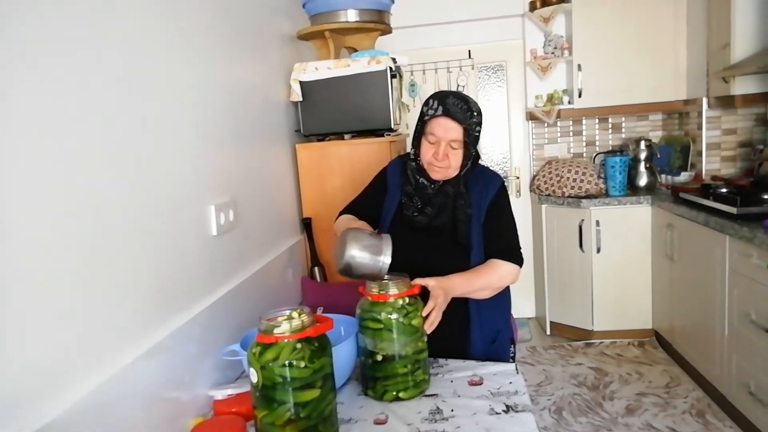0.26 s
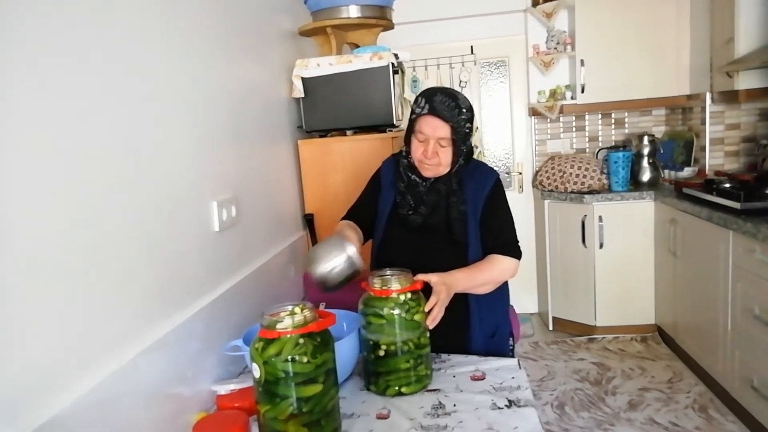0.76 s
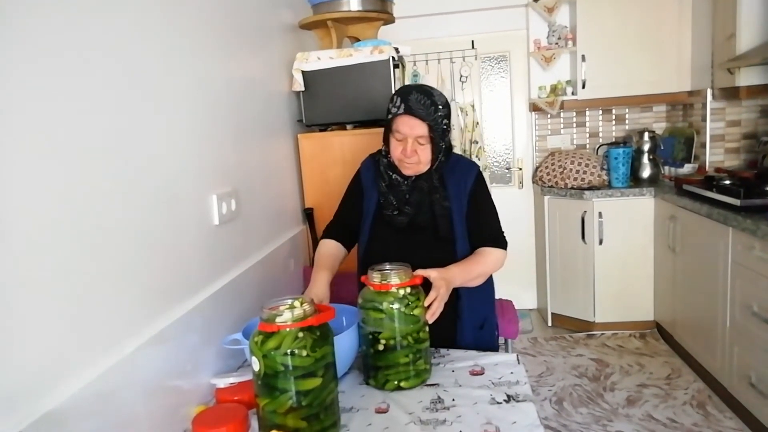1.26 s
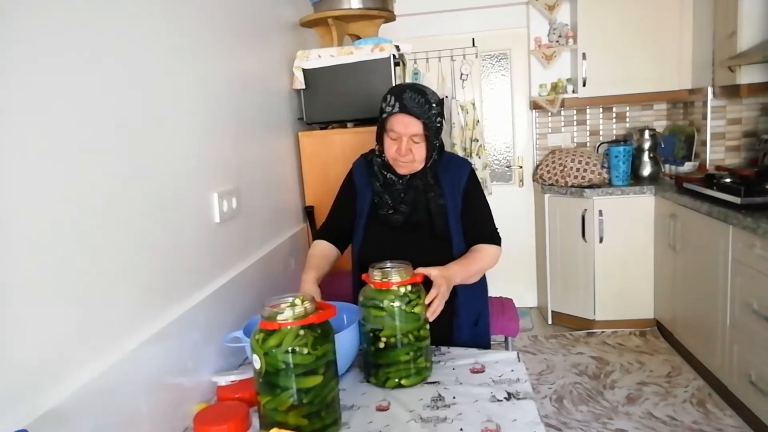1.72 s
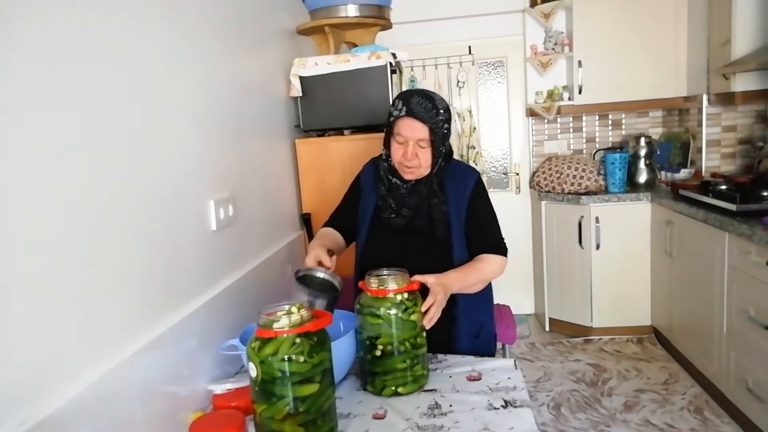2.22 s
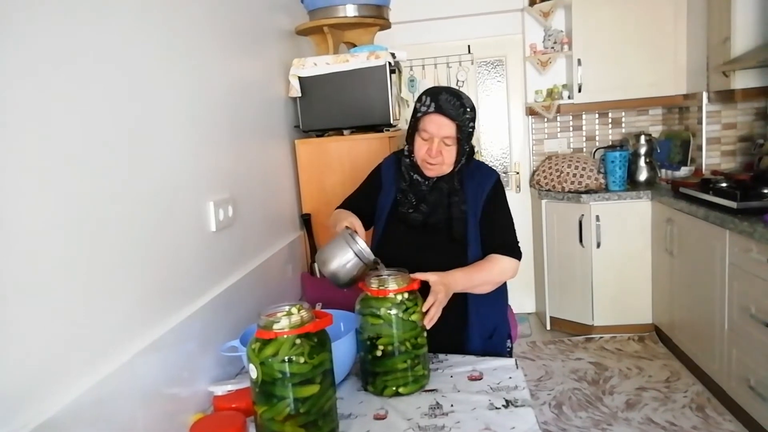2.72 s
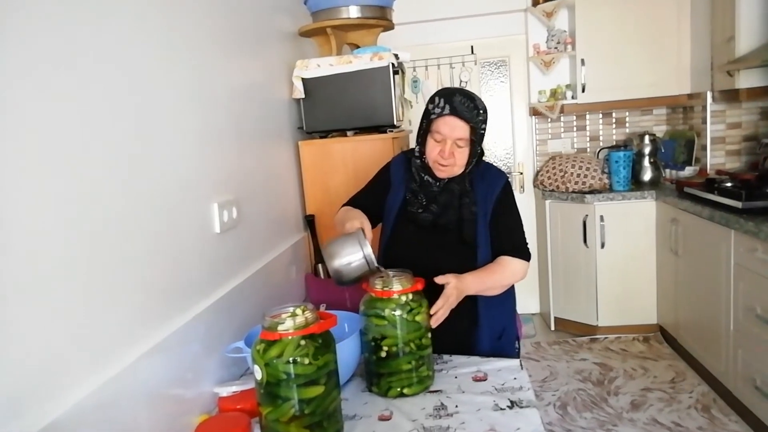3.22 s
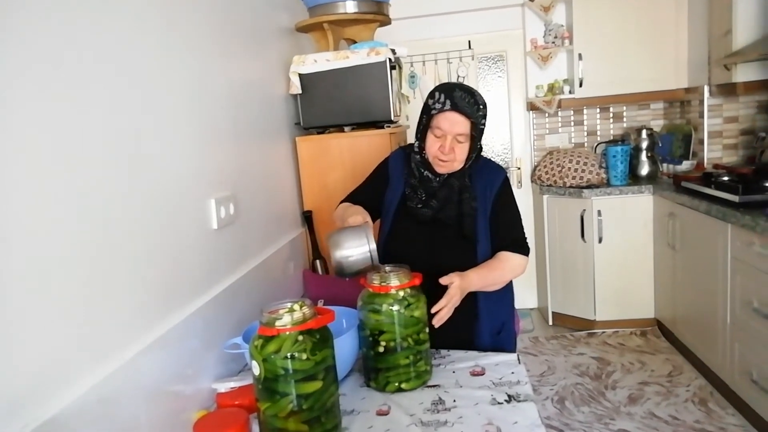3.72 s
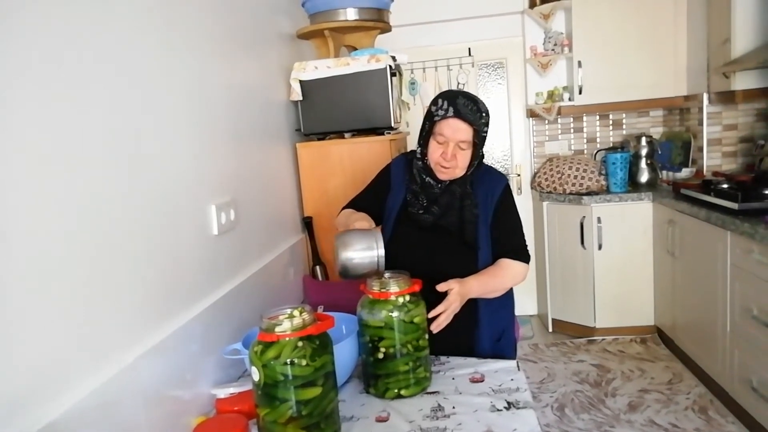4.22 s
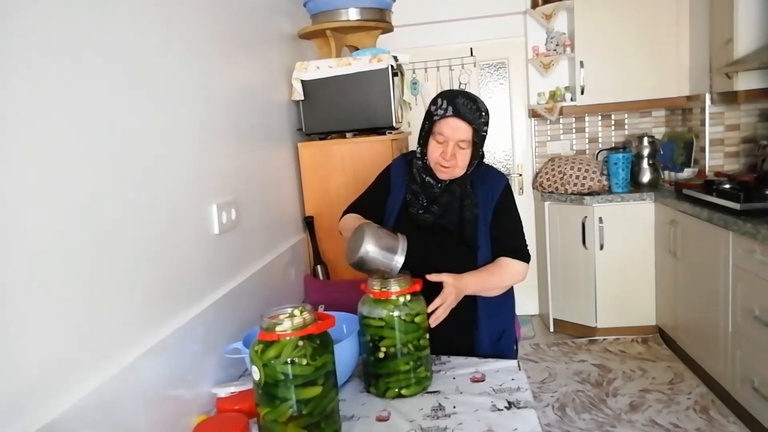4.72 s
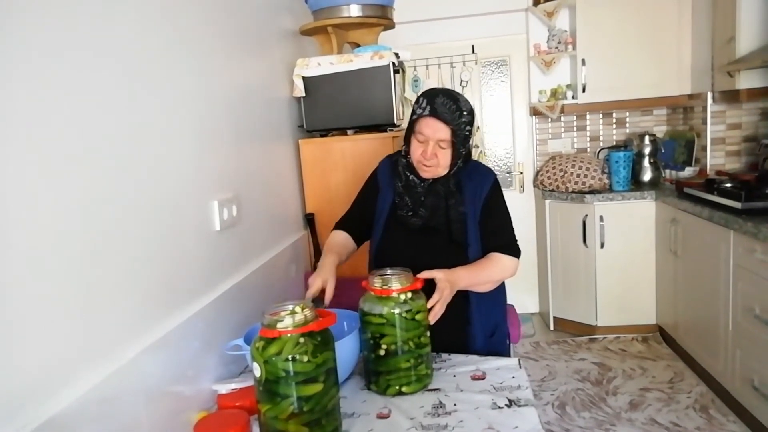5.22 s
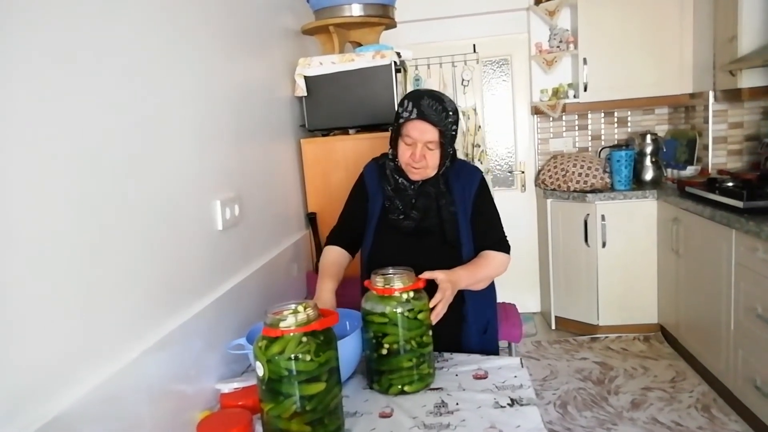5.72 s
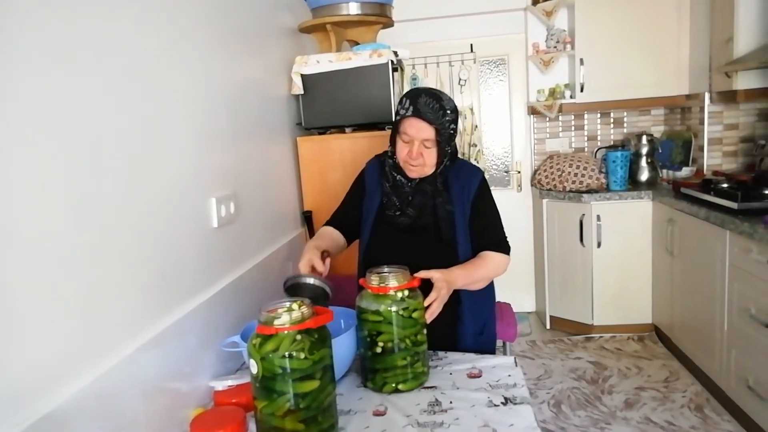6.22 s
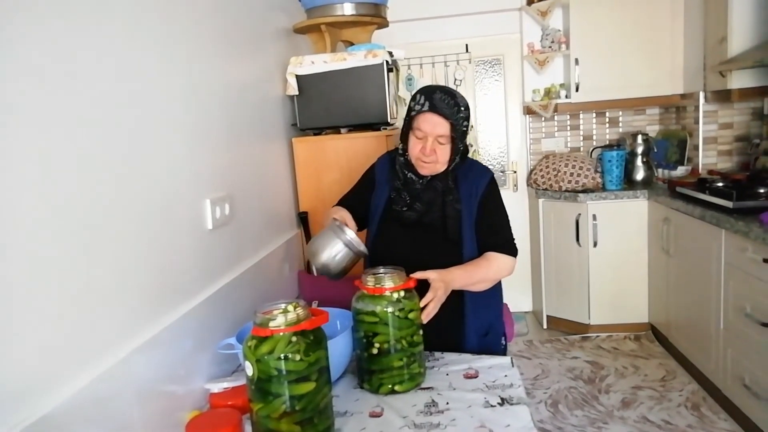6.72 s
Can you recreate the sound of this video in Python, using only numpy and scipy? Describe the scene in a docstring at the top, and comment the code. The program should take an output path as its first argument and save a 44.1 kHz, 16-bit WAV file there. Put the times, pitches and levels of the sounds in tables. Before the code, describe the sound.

Steel pot, glass jar of cucumbers and a bucket of brine, heard in stereo in a small home kitchen. A weak trickle gives way to wet snaps, dull knocks and slapping water. Bright metallic clinks on glass come next, with a rising sung note, a short gush and sparse bubbles. After a near-quiet pause with faint touches, the pot plunges again, splashing and dripping over quiet room tone.

```python
"""Brine is scooped with a small steel pot from a bucket on a kitchen floor and poured into a jar of cucumbers.
First brine trickles and bubbles, as random clouds of ringing bubbles, and the pot faintly sings and clinks on the rim.
Then it spatters, bumps and sloshes in the bucket: filtered noise bursts, most of them heard through the reverb.
It clinks on the jar as a bank of decaying modes, its lowest note climbing as it drains into trickle and bubbles.
Two faint touches follow, then a second scoop with sloshes and drips; quiet air and a low hum lie under it all."""
import sys
import numpy as np
from scipy import signal
from scipy.fft import rfft, irfft, next_fast_len
from scipy.io import wavfile

SR = 44100
rng = np.random.default_rng(int(sys.argv[2]) if len(sys.argv) > 2 else 0)


def store_wav(level_fs):
    """Save 16-bit WAV to argv[1]."""
    pcm = np.round(np.clip(np.atleast_2d(level_fs), -1, 1) * 32767)
    wavfile.write(sys.argv[1], SR, pcm.T.astype(np.int16))


N = 306997
TIME = np.arange(N) / SR

# kitchen reverberation: (frequency [Hz], t60 [s])
KITCHEN_T60 = [(170, 0.78), (400, 0.4), (1000, 0.5462), (2800, 0.4041), (7000, 0.3), (15000, 0.24)]
# likeness of the two microphones in diffuse sound: (frequency [Hz], correlation [-1 to 1])
MIC_LIKENESS = [(30, 0.997), (100, 0.98), (190, 0.96), (350, 0.71), (700, 0), (1400, 0.14), (2500, 0.01)]
# colour difference of the microphone ports: (frequency [Hz], left minus right [dB])
MIC_PORTS = [(170, 0), (350, -2), (800, 3), (1200, 2), (1500, -2), (2800, 3), (4300, -4), (5700, -4),
             (6900, -8), (8500, -1), (10500, 3), (12000, 7), (14000, 12)]
LEFT_LEAD_S = 6e-5  # direct sound reaches the left microphone first
EDGE_HZ = 15900  # upper band limit

# the quiet kitchen: (frequency [Hz], density [dB per Hz])
AIR_COLOUR = [(18, -10.5), (40, 1), (60, -4), (95, -7.5), (120, -15), (280, -19.5), (450, -21.5),
              (700, -25), (1700, -26.5), (2400, -34.5), (4000, -29.5), (7000, -35), (9000, -44.5),
              (15000, -39)]
# swells of the low hum: (centre [s], lift [dB], half width to 1/e of the lift [s])
HUM_SWELLS = [(4.0, 9.9, 0.24), (6.2, 3.2, 0.27)]
AIR_DB, HUM_DB, HUM_HZ = -63.5, -69, 81.7

# brine gushing into the jar or back into the bucket: (time [s], level [dB], hold [s], release t60 [s])
GUSHES = [(0, -64, 0.46, 1.26), (2.966, -51, 0.12, 0.31), (3.15, -61, 0.23, 1.6), (3.726, -68, 0.35, 1.2),
          (4.489, -68, .12, 1), (5.851, -59, 0.22, 0.22)]
# colour of the trickling brine: (frequency [Hz], density [dB per Hz])
TRICKLE_COLOUR = [(200, -6.5), (700, -7.5), (1250, 3.5), (1800, 4), (2300, -2), (2900, 0), (4000, -11),
                  (6500, -5), (8500, -14), (15500, -13)]
GUSH_ATTACK_S = 0.02
SEEP_DB = -74  # brine keeps seeping down between the cucumbers

# spells of small random bubbles: (start [s], end [s], rate [bubbles per s], typical pitch [Hz])
BUBBLING = [(0.118, .45, 20, 5030), (3.199, 4.45, 18, 2720)]
BUBBLE_DB, BUBBLE_SPREAD_DB = -42, 3
BUBBLE_OCTAVES, BUBBLE_CYCLES = .6, 3  # spread of pitch; cycles in which a bubble dies away
DROP_DIRECT_DB = -6  # direct sound against the room, for drops and bubbles

# swells of the pot's lowest note as it sings and lingers: (time [s], level [dB], hold [s], release t60 [s])
NOTE_SWELLS = [(0.239, -61, .02, 0.13), (0.306, -55.5, 0.023, 0.1), (2.751, -41.5, 0.093, 0.081),
               (2.881, -44, 0.025, 0.28), (2.943, -36.5, 0.02, 0.12), (2.99, -38, 0.07, .8),
               (3.34, -74, .1, 3.5), (4.663, -59.5, 0.019, 0.46)]
# the pot's lowest note climbing while it drains: (time [s], pitch [Hz])
DRAINING = [(2.754, 874), (2.85, 943), (2.955, 977), (3.03, 1111), (3.15, 1114), (3.26, 1198), (3.4, 1238),
            (3.7, 1273), (4.3, 1265)]
NOTE_ATTACK_S = 0.012
RESTING_HZ = 1067  # the lowest note while the pot is held level
DRAINED_HZ = 1260  # the lowest note once the water has left the wall

# the clearest drops, bubbles and a small rattle: (time [s], level [dB], pitch [Hz], decay [s])
SHORT_RINGS = [(.285, -30, 4440, 0.0042), (1.286, -25, 4900, 0.00053), (1.296, -26.5, 5700, .0006),
               (1.799, -13, 2360, 0.00039), (1.803, -14, 3260, 0.00042), (2.533, -32, 3430, 0.0012),
               (3.102, -16.5, 3360, 0.00009), (3.265, -30.5, 2890, 0.0017), (3.354, -24, 2550, 0.00071),
               (3.38, -27, 2780, 0.0014), (3.659, -29.5, 2600, 0.0011), (3.712, -24, 1523, 0.00096),
               (3.769, -37, 4320, 0.0035), (3.998, -31, 3220, 0.0014), (4.29, -32, 2730, 0.0007),
               (4.998, -36, 2600, 0.00095), (5.314, -27.5, 2700, .0014), (5.955, -25.5, 3400, 0.00055),
               (5.965, -22, 870, 0.0045), (5.989, -11, 1800, .0045), (5.99, -16.5, 854, 0.019),
               (6.03, -26.5, 3980, 0.00063), (6.05, -21, 900, 0.0022), (6.529, -29, 2250, .002),
               (6.532, -28.5, 2910, .002)]

# touches of pot and jar rim:
# (time [s], ring [dB], clack [dB], thud of the jar on the table [dB], fill of the pot [0 to 1])
CLINKS = [(.323, -19.5, -17.5, -24.5, 0.03), (2.753, -4, -0.5, -8.5, 0.86),
          (2.761, -9.5, -8.5, -16.5, 0.91), (2.888, -9, -7.5, -20, 0.9), (2.997, -18, -10, -20.5, 1),
          (4.657, -22, -18.5, -26.5, 0.02), (4.68, -25, -25, -38, 0.02)]
# modes of the steel pot:
# (frequency [Hz], level empty [dB], level full [dB], t60 [s], share of the water's pull on pitch [exponent])
POT_MODES = [(1062, 3, -44, .35, .05), (1833, -19, -6, .5, .33), (2126, -11, -8, .35, .48),
             (2416, -22, -5, .37, .07), (2573, -15, -5, .5, .185), (3000, -9, -9, .21, .03),
             (3215, -1, -1, .25, 0), (3360, -8, 0, .3, 0), (3466, -8, 3.5, .55, 0), (3666, -8, -16, .25, 0),
             (3870, -12, -2.5, .3, 0), (3978, -4, -20, .18, 0), (4143, -12, -5, .33, 0),
             (4215, 0, -20, .25, 0), (4312, -18, 0, .28, 0), (4786, -11, -9, .5, 0), (4990, -8, -5, .3, 0),
             (5230, -25, -8, .3, 0), (5370, -4, -14, .45, 0), (5870, -10, -16, .22, 0),
             (6280, -9, -10, .31, 0), (6551, -15, -7, .38, 0), (7150, -8, -8, .3, 0),
             (8027, -27, -13, .35, 0)]
# steel on glass: (frequency [Hz], density [dB per Hz])
CLACK_COLOUR = [(200, -8.5), (620, -3), (850, 5), (1150, -11), (1600, 3), (2100, -6.5), (3200, 4.5),
                (4500, 1.5), (6800, -1), (8500, -6.5), (12000, -5.5), (15500, -9.5)]
# the jar on the table: (frequency [Hz], density [dB per Hz])
THUD_COLOUR = [(60, -29), (120, -7.5), (180, -7), (350, 3.5), (480, -13.5), (650, -9), (1500, -67),
               (6000, -83)]

# sharp spatters of brine: (time [s], level [dB], decay [s])
SPATTERS = [(1.114, -6.5, 0.0063), (1.126, -16, 0.0035), (1.633, -20.5, 0.0064), (1.666, -16.5, 0.0081),
            (1.798, -18, 0.016), (2.344, -35.5, 0.00077), (6.051, -29, .0033)]
# colour of the spatters: (frequency [Hz], density [dB per Hz])
SPATTER_COLOUR = [(150, -29), (500, -17), (1100, -9.5), (2000, -21.5), (3300, -5.5), (5000, 2), (6800, 4.5),
                  (8500, -2.5), (11000, -0.5), (15500, -5.5)]

# bumps and plunges of the pot in the bucket:
# (time [s], body [dB], thud [dB re body], clatter [dB re body], fizz [dB re body], splash decay [s])
SCOOPS = [(1.358, -5, -6.5, 0, -15, 0.0061), (1.451, 1.5, -8.5, -2.5, -12, 0.0057),
          (1.463, 2, -3, -7, -8.5, 0.0042), (1.55, -11, 1, -10, -21, 0.0072),
          (1.645, -8, 0, -2, -14, 0.017), (1.838, -3, -10.5, -12.5, -15.5, 0.0047),
          (5.621, 3, -4, -6.5, -9, 0.009), (5.682, -4, -4, 0.5, -6, 0.0045)]
# borders of the thud, body, clatter and fizz bands: (frequency [Hz])
BAND_EDGES = [50, 600, 2300, 7500, 15900]
# the bucket with its brine: (frequency [Hz], density [dB per Hz])
BUCKET_COLOUR = [(59, -54), (100, -16.5), (170, -19), (277, -8), (398, -2.5), (583, -3), (930, -8),
                 (1350, -17.5), (1950, -19), (2420, -27), (2930, -21), (3940, -24), (7140, -25),
                 (8640, -26.5), (14700, -19), (16000, -30)]
# resonances and dips of the bucket: (frequency [Hz], width [Hz], lift [dB])
BUCKET_HOLLOW = [(176, 42, 16), (112, 30, -6), (330, 90, -6), (460, 90, -6), (530, 30, 3), (650, 230, -17),
                 (1000, 170, 3), (1420, 50, 3), (1980, 300, 5), (2920, 100, 3), (3400, 600, 3),
                 (6300, 400, 4), (8400, 1200, -4), (9900, 900, 4)]

# brine slapping back and forth against the bucket wall: (time [s], level [dB], decay [s])
SLOSHES = [(1.756, -9.5, 0.012), (1.949, -8.5, 0.011), (2.081, -12, 0.012), (2.236, -17, 0.027),
           (2.279, -17, 0.021), (5.861, -15, .006), (6.088, -18.5, 0.014), (6.157, -18, 0.013),
           (6.263, -21, 0.026)]
# colour of the slaps: (frequency [Hz], density [dB per Hz])
SLOSH_COLOUR = [(90, -2.5), (170, 1), (300, -6.5), (440, 0), (620, -6.5), (950, -4), (1400, -5.5),
                (1900, -8), (2400, -16.5), (3300, -23.5), (5000, -25.5), (15500, -38)]


def gain_of(db):
    """Decibels to amplitude."""
    return 10 ** (np.asarray(db) / 20)


def unit(x):
    """Scales to an energy of 1 a channel, averaged over the channels."""
    return x / np.sqrt(np.mean(np.sum(x ** 2, -1)) + 1e-30)


def read(points, hz):
    """Reads a spectrum on a log-frequency axis."""
    f, value = np.transpose(points)
    return np.interp(np.log(hz + 1), np.log(f + 1), value)


def follow(points, t):
    """Reads a curve at the times t."""
    return np.interp(t, *np.transpose(points))


def add(mix, s, sound):
    """Lays a sound into the mix at s seconds, cut off at the end of the mix."""
    part = mix[:, round(s * SR):][:, :sound.shape[1]]
    part += sound[:, :part.shape[1]]


def colour(x, points, peaks=(), size=4096):
    """Causal minimum-phase filter from a spectrum and a few resonances."""
    hz = abs(np.fft.fftfreq(size, 1 / SR))
    db = read(points, hz)
    for f, width, lift in peaks:
        db = db + lift / (1 + (2 * (hz - f) / width) ** 2)
    log_response = np.conj(signal.hilbert(np.log(gain_of(db))))  # the phase follows from the log level
    taps = np.fft.ifft(np.exp(log_response)).real[:size // 2]
    return np.apply_along_axis(signal.fftconvolve, -1, x, taps)[..., :x.shape[-1]]


def diffuse(count):
    """Noise from all sides: most alike at both microphones in the bass."""
    a, b = rfft(rng.standard_normal((2, count)))
    same = np.clip(read(MIC_LIKENESS, np.fft.rfftfreq(count, 1 / SR)), -1, 1)
    return irfft(np.array([a, same * a + np.sqrt(1 - same ** 2) * b]), count)


def kitchen(x, direct_db, build_s=0.00043, size=256):
    """The direct sound, then dense reflections that build up and die faster in the treble."""
    hz, t, z = signal.stft(diffuse(count=32768), SR, nperseg=size)
    decay = gain_of(-60 * t / read(KITCHEN_T60, hz)[:, None])
    tail = signal.istft(z * decay, SR, nperseg=size)[1]
    build_up = 1 - np.exp(-TIME[:tail.shape[1]] / build_s)
    response = unit(tail * build_up)
    response[[0, 1], [0, round(LEFT_LEAD_S * SR)]] += gain_of(direct_db)
    return signal.fftconvolve(x[None], unit(response), axes=1)


def burst(decay_s, grain_db=4, rise=0.25, count=8192):
    """A contact: a cluster of tiny uneven impacts that swells and dies away."""
    grains = rng.standard_normal(count) * gain_of(grain_db * rng.standard_normal(count))
    age = TIME[1:count + 1] / max(decay_s, 1 / SR)
    return grains * np.exp(-age) * (1 - np.exp(-age / rise))


def bubble(hz, decay_s, rise=0.0033, count=4096):
    """A short ring, as of a trapped air bubble: it swells, dies away and rises slightly in pitch."""
    age = TIME[:count] / max(decay_s, 1 / SR)
    envelope = np.exp(-age) * (1 - np.exp(-2 * age))
    turns = np.cumsum(hz * (1 + rise * np.minimum(age, 10))) / SR
    return unit(envelope * np.sin(2 * np.pi * turns))


def swell(s, db, hold_s, t60, attack_s):
    """An envelope that rises from s, holds, and dies away."""
    age = TIME - s
    attack = np.clip(age / attack_s, 0, 1)
    return attack * gain_of(db) * np.exp(-np.log(1000) * np.maximum(age - hold_s, 0) / t60)


def room_tone(waver=.9, hum_width_hz=9):
    """Faint rumble and hiss with two resonances, and a low hum wavered by slow noise."""
    air = np.sqrt(N) * unit(colour(diffuse(N), AIR_COLOUR, [(274.5, 72, 9.6), (568.5, 15.4, 17.0)]))
    lowpass = signal.butter(2, hum_width_hz, fs=SR, output="sos")
    drift = np.sqrt(N) * unit(signal.sosfilt(lowpass, rng.standard_normal((2, N))))
    wavering = 1 + waver * (drift[0] + 1j * drift[1])  # shifts both level and phase
    hum = (wavering * np.exp(2j * np.pi * HUM_HZ * TIME)).real
    hum_db = HUM_DB
    for s, lift_db, width_s in HUM_SWELLS:
        hum_db = hum_db + lift_db * np.exp(-((TIME - s) / width_s) ** 2)
    return gain_of(AIR_DB) * air + gain_of(hum_db) * hum


def trickle(per_s=600, cycles=3, spread_db=1.5, count=30):
    """A thin stream breaks into a crowd of tiny bubbles, spread over a range of fixed pitches."""
    crowd = np.zeros(N)
    for hz in np.geomspace(500, 14000, count):
        born = rng.random(N) < per_s / count / SR
        sizes = gain_of(spread_db * np.minimum(rng.exponential(1, N), 4)) * born
        crowd += np.sqrt(hz) * signal.oaconvolve(sizes, bubble(hz, cycles / hz))[:N]
    gush_power = sum(swell(*gush, GUSH_ATTACK_S) ** 2 for gush in GUSHES)
    flow = np.sqrt(gain_of(SEEP_DB) ** 2 + gush_power)
    stream = np.sqrt(N) * unit(colour(crowd, TRICKLE_COLOUR)) * flow
    return kitchen(stream, direct_db=-11.0)[:, :N]


def bubbling():
    """Air escapes between the cucumbers in small bubbles of chance size and pitch."""
    out = np.zeros((1, N))
    for start, end, per_s, typical_hz in BUBBLING:
        slots = np.arange(start, end, 1 / per_s)
        chances = rng.uniform(-1.1, 1, (len(slots), 3))
        for slot, (late, size, pitch) in zip(slots, chances):
            hz = typical_hz * 2 ** (BUBBLE_OCTAVES * pitch)
            level = gain_of(BUBBLE_DB + BUBBLE_SPREAD_DB * size)
            add(out, abs(slot + .5 * late / per_s), level * bubble(hz, BUBBLE_CYCLES / hz)[None])
    return kitchen(out[0], DROP_DIRECT_DB)[:, :N]


def draining_note(pan_db=1.3, echo_db=-12):
    """The pot's lowest note swells, sings and lingers, higher as the water leaves its wall."""
    hz = np.interp(TIME, *np.transpose(DRAINING), left=RESTING_HZ, right=RESTING_HZ)
    level = sum(swell(*note_swell, NOTE_ATTACK_S) for note_swell in NOTE_SWELLS)
    turns = np.cumsum(hz) / SR + np.outer([LEFT_LEAD_S, 0], hz)
    note = np.sqrt(2) * level * np.sin(2 * np.pi * turns)
    echo = kitchen(note[0], direct_db=-42)[:, :N]
    return note * gain_of([[pan_db], [-pan_db]]) + gain_of(echo_db) * echo


def short_rings():
    """The clearest drops, bubbles and a small rattle, each a short ring."""
    out = np.zeros((2, N))
    for s, db, hz, decay_s in SHORT_RINGS:
        add(out, s, gain_of(db) * unit(kitchen(bubble(hz, decay_s), DROP_DIRECT_DB)))
    return out


def pot_ring(s, fill, split=0.0019):
    """The pot's modes after one blow; the handle splits each into a close pair, clinging water lowers some."""
    t = TIME[:SR // 2]
    note_hz = follow(DRAINING, s + t)
    load = 1 + fill * (note_hz / DRAINED_HZ - 1)  # pitch ratio of the water-laden wall
    ring = np.zeros((2, len(t)))
    for hz, empty_db, full_db, t60, pull in POT_MODES:
        turns = np.cumsum(hz * load ** pull) / SR
        pair = np.exp(2j * np.pi * np.outer([1, 1 + split * rng.standard_normal()], turns))
        phases = np.exp(2j * np.pi * rng.random((2, 2)))  # microphone by twin
        heard = (phases * [1, .5]) @ pair
        level = gain_of(empty_db + fill * (full_db - empty_db))
        ring += level * np.exp(-np.log(1000) * t / t60) * heard.real
    return unit(ring * (1 - np.exp(-t / .003)))  # soft onset


def clinks(echo_db=-4):
    """Steel meets the glass rim: a clack, the ring of the pot and a thud through the jar."""
    out = np.zeros((2, N))
    for s, ring_db, clack_db, thud_db, fill in CLINKS:
        ring = pot_ring(s, np.clip(fill, 0, 1))
        echo = unit(kitchen(ring[0], direct_db=3.5))
        clack = unit(kitchen(colour(burst(decay_s=0.0048), CLACK_COLOUR), direct_db=-13.5))
        thud = unit(kitchen(colour(burst(decay_s=0.003), THUD_COLOUR), direct_db=-7))
        add(out, s, gain_of(ring_db) * ring)
        add(out, s, gain_of(ring_db + echo_db) * echo)
        add(out, s, gain_of(clack_db) * clack)
        add(out, s, gain_of(thud_db) * thud)
    return out


def spatters():
    """Flat drops slap down with a bright, short snap of noise."""
    out = np.zeros((2, N))
    for s, db, decay_s in SPATTERS:
        snap = colour(burst(decay_s), SPATTER_COLOUR)
        add(out, s, gain_of(db) * unit(kitchen(snap, direct_db=-13.0)))
    return out


def scoops():
    """Bumps and sloshes in the bucket; the table hides it, so mostly reflections arrive."""
    out = np.zeros((2, N))
    bands = [signal.butter(4, edges, "band", fs=SR, output="sos") for edges in zip(BAND_EDGES, BAND_EDGES[1:])]
    for s, body_db, thud_db, clatter_db, fizz_db, decay_s in SCOOPS:
        blow = colour(burst(decay_s), BUCKET_COLOUR, BUCKET_HOLLOW)
        heard = kitchen(blow, direct_db=-10.0, build_s=0.00091)
        for band, share_db in zip(bands, (thud_db, 0, clatter_db, fizz_db)):
            add(out, s, gain_of(body_db + share_db) * unit(signal.sosfilt(band, heard)))
    return out


def sloshes(bubble_db=-5, count=6):
    """Each wave slaps the wall and traps a few bubbles."""
    out = np.zeros((2, N))
    for s, db, decay_s in SLOSHES:
        slap = unit(colour(burst(decay_s), SLOSH_COLOUR))[None]
        for late, pitch in rng.random((count, 2)):
            hz = 700 + 1300 * pitch
            level = gain_of(bubble_db) / np.sqrt(count)
            add(slap, 2 * late * decay_s, level * bubble(hz, 4 / hz)[None])
        add(out, s, gain_of(db) * unit(kitchen(slap[0], direct_db=-0.5)))
    return out


def scene():
    """Scooping, clinking and pouring in the quiet kitchen."""
    pouring = trickle() + bubbling() + draining_note() + short_rings() + clinks()
    scooping = spatters() + scoops() + sloshes()
    return room_tone() + pouring + scooping


def record(dry, hiss_db=-77):
    """The two microphone ports colour the sound differently; each adds its own hiss; then the band limit."""
    size = next_fast_len(N + SR)
    tilt_db = read(MIC_PORTS, np.fft.rfftfreq(size, 1 / SR)) / 2
    heard = irfft(rfft(dry, size) * gain_of([tilt_db, -tilt_db]), size)[:, :N]
    heard = heard + gain_of(hiss_db) * rng.standard_normal((2, N))
    lowpass = signal.firwin(401, EDGE_HZ, window=("kaiser", 8), fs=SR)
    return signal.oaconvolve(heard, lowpass[None], "same")


dry = scene()
out = record(dry)
store_wav(out)
```